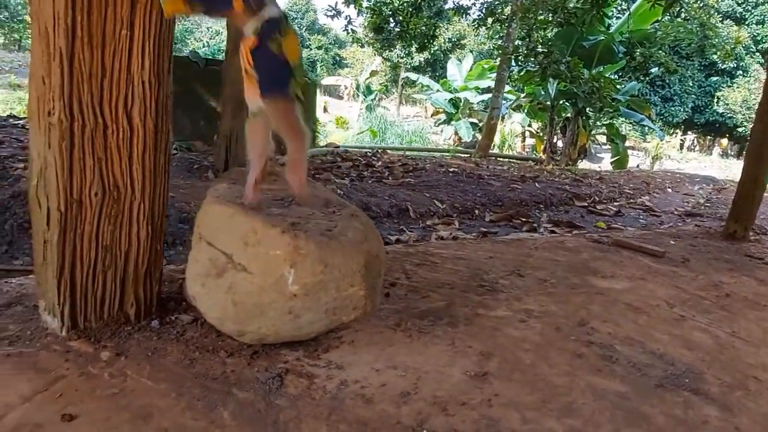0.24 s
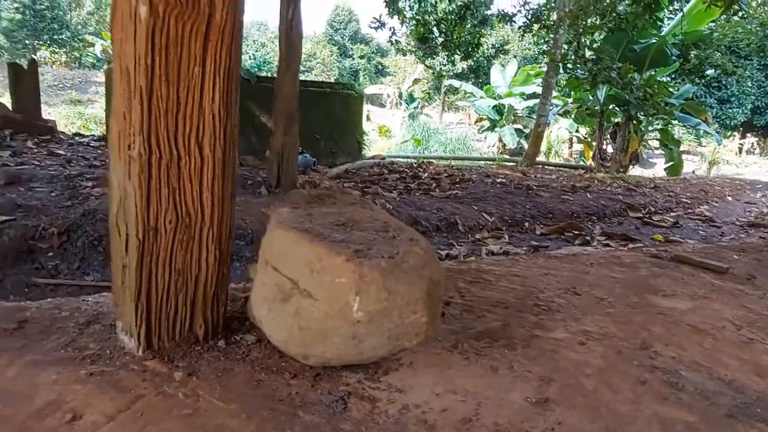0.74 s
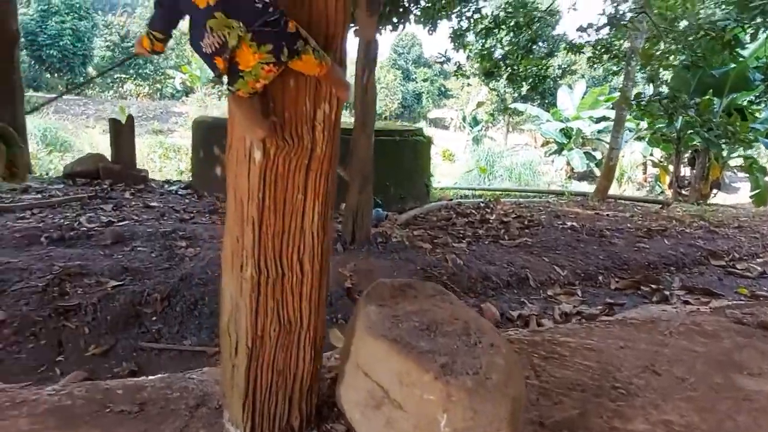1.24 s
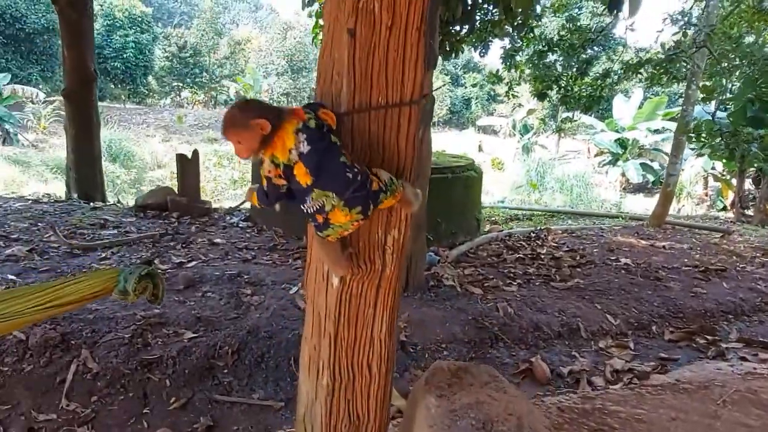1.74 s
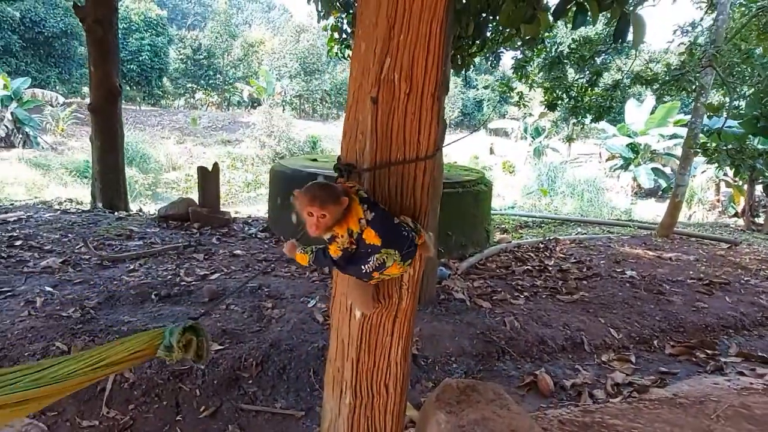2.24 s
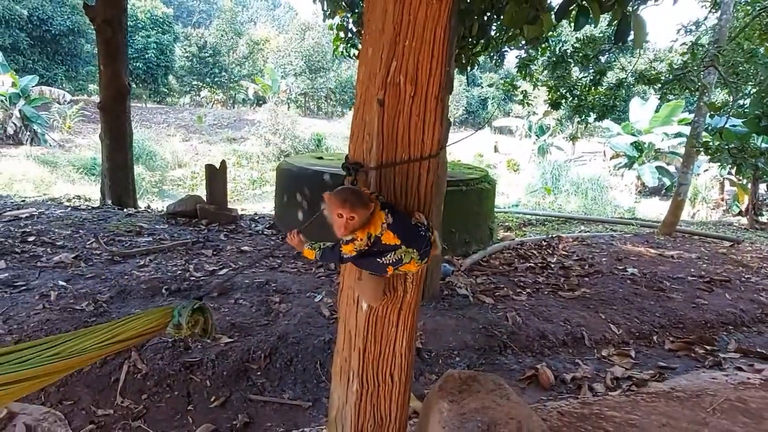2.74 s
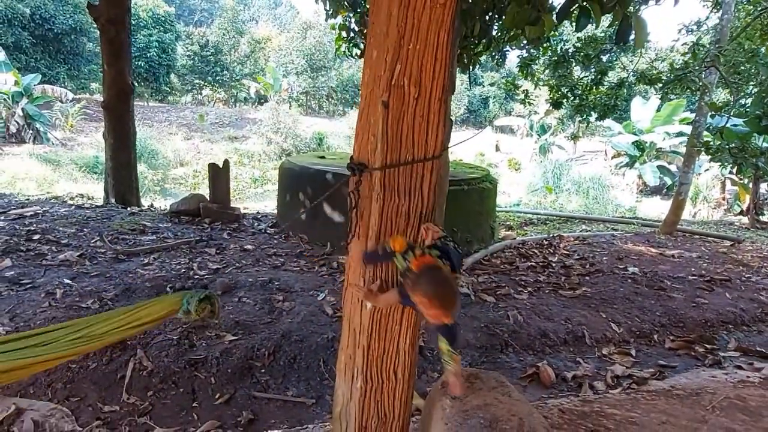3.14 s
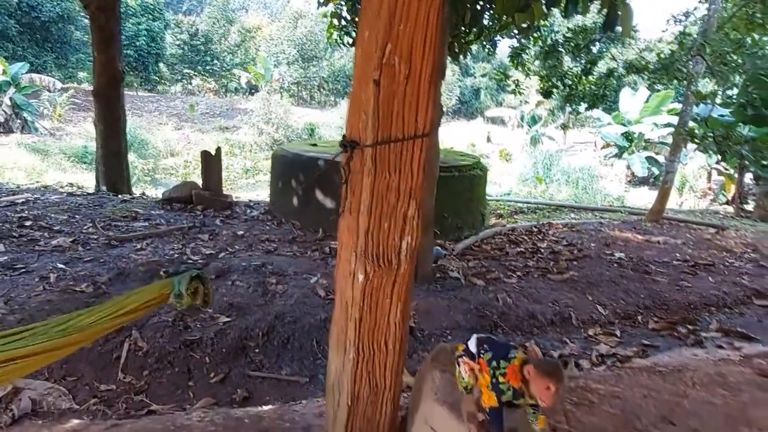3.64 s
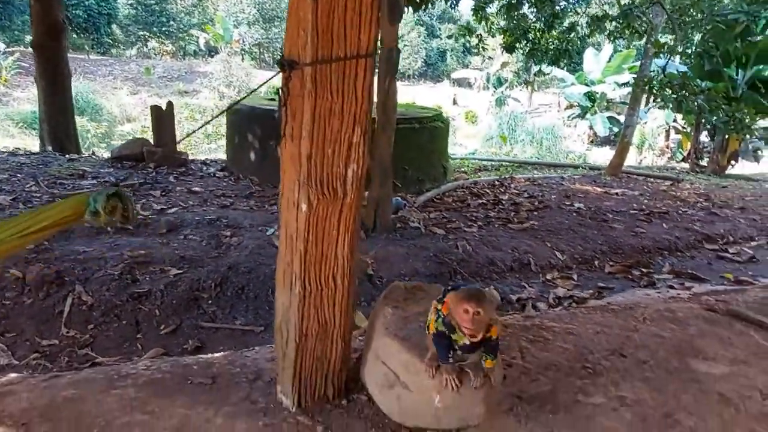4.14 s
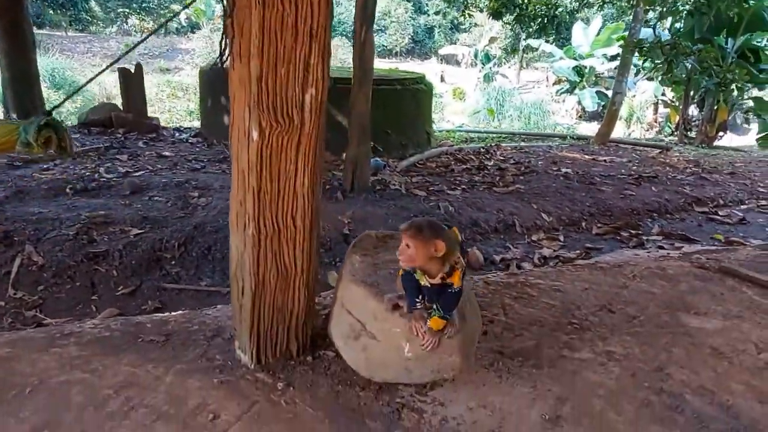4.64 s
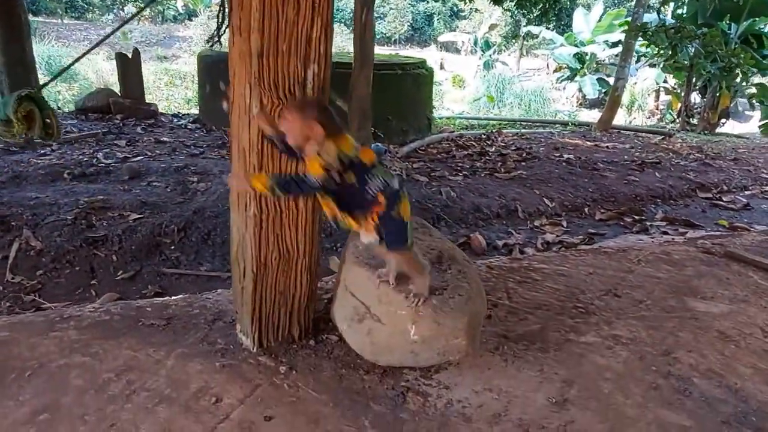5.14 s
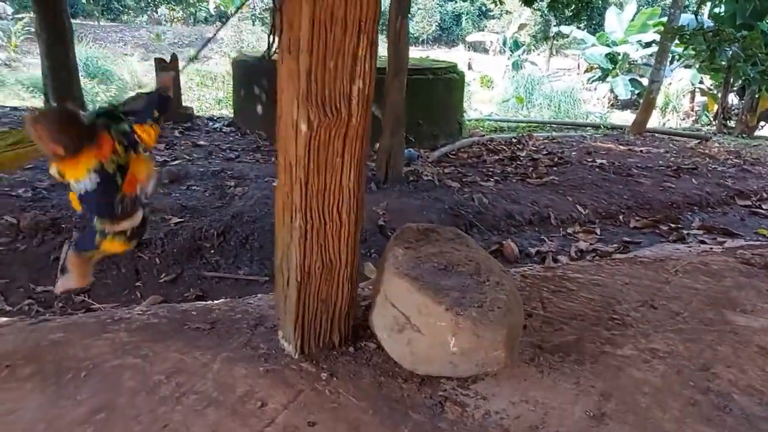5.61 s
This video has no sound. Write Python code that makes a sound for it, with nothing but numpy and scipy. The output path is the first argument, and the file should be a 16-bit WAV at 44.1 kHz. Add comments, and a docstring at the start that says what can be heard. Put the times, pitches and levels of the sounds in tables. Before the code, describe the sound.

Small monkey cries, two raspy screeches with clear coos between, plus light taps and scuffs on wood and stone in a quiet yard.

```python
"""A baby monkey calls as it climbs about in a quiet yard: a harsh screech, two clear coos (one falling,
one whipping upward), a whimper and a second screech. Screeches are harmonic stacks that tear into rasp;
coos are two sine partials with fluttering overtones. Hands and feet tap and scuff on a wooden post and a
stone in bursts of coloured noise; insects buzz in narrow noise bands, and a small bird peeps far off in
two falling sines. The ground and the shelter around the post answer with a short echo."""
import sys
import numpy as np
from scipy import signal
from scipy.fft import rfft, irfft, next_fast_len
from scipy.io import wavfile
from scipy.ndimage import uniform_filter1d, map_coordinates

SR = 44100
rng = np.random.default_rng(int(sys.argv[2]) if len(sys.argv) > 2 else 0)


def generate_wav(signal):
    """Clip the signal to [-1, 1] and save it as 16-bit WAV at the path in sys.argv[1]."""
    frames = np.transpose(np.atleast_2d(signal))
    scaled = np.clip(frames, -1, 1) * 32767
    pcm = np.round(scaled).astype(np.int16)
    wavfile.write(sys.argv[1], SR, pcm)


N = 258867
TIME = np.arange(N) / SR

# pitch of the first screech, then of the whimper and second screech: [t/s, f/Hz]
SCREECH_PITCHES = [
    [(.522, 722), (.55, 815), (.572, 935), (.605, 935), (.63, 900), (.645, 880), (.658, 805), (.69, 782),
     (.717, 773), (.728, 716), (.75, 707), (.82, 590), (.855, 500), (.895, 311)],
    [(5.19, 672), (5.215, 640), (5.245, 592), (5.28, 625), (5.32, 685), (5.36, 782), (5.39, 675),
     (5.405, 765), (5.425, 784), (5.445, 762), (5.465, 786), (5.487, 745), (5.51, 835), (5.55, 752),
     (5.6, 780), (5.7, 850)],
]
# register levels before their trims: [t/s, fundamental level/dB, throat level/dB, shrill rasp level/dB]
FIRST_SCREECH_LEVELS = [(.51, -61, -59, -58), (.522, -48, -45, -51), (.552, -50, -40, -41),
                        (.59, -50, -44, -37), (.61, -47, -41, -36), (.64, -52, -33, -23),
                        (.662, -42, -35, -22), (.682, -48, -34, -25), (.712, -54, -31, -21.5),
                        (.726, -38.5, -35, -25), (.765, -37, -34.5, -24), (.82, -41, -37, -34),
                        (.858, -44, -35, -42), (.882, -45, -44, -48), (.915, -66, -55, -59)]
SECOND_SCREECH_LEVELS = [(5.19, -66, -47, -52), (5.232, -54, -49, -53), (5.26, -53, -51, -53),
                         (5.308, -65, -52, -51), (5.358, -47, -43, -37), (5.382, -56, -44, -35),
                         (5.412, -46, -37, -23.5), (5.474, -48, -36, -23), (5.502, -53, -38, -29),
                         (5.602, -63, -46, -36), (5.646, -65, -44, -35), (5.7, -71, -53, -43),
                         (5.8, -95, -72, -62)]
# how far the voice tears: [t/s, roughness 0-1]
ROUGHNESS = [(.555, .55), (.58, .35), (.635, .25), (.66, .5), (.695, .3), (.76, .32), (.83, .5), (.9, .55),
             (5.19, .45), (5.355, .4), (5.385, .55), (5.41, .3), (5.45, .38), (5.5, .6), (5.57, .7),
             (5.63, .97)]
# main resonance of the mouth: [t/s, f/Hz]
MOUTH_RESONANCE = [(.51, 3000), (.575, 3650), (.6, 3750), (.64, 3580), (.675, 3170), (.72, 3120),
                   (.745, 3550), (.8, 3220), (.87, 3030), (5.19, 2750), (5.24, 2600), (5.3, 3050),
                   (5.44, 3100), (5.49, 3300), (5.56, 3050), (5.65, 3600)]
# high whistling resonance: [t/s, f/Hz, share of the air noise 0-1]
WHISTLE = [(.62, 8100, .15), (.71, 8550, .25), (.76, 8200, .2), (5.49, 8500, .12), (5.54, 10000, .15),
           (5.63, 9400, .4), (5.7, 8650, .7)]
# colour of the throat register: [f/Hz, relative level/dB]
THROAT_SPECTRUM = [(900, -25), (1500, -11), (2100, -6), (3000, -2.5), (3600, -1), (4600, -4), (5900, -9),
                   (6600, -25)]
# colour of the shrill register in each screech: [f/Hz, relative level/dB]
FIRST_SHRILL_SPECTRUM = [(5300, -33), (6400, -11), (7000, -3), (8400, 0), (11000, -5), (12500, -14),
                         (15500, -26)]
SECOND_SHRILL_SPECTRUM = [(4600, -32), (5400, -11), (7000, -3), (8500, 0), (10500, -6), (11500, -14),
                          (15500, -28)]
MOUTH_WIDTH_HZ, MOUTH_BOOST = 220, 3.2  # half-width; gain added at the peak
WHISTLE_WIDTH_HZ, WHISTLE_BOOST = 300, 1.3
TONE_DB, THROAT_DB, RASP_DB = -1, 2, 1.5  # register trims
GROWL_HZ, GROWL_DEPTH = 240, 1.8  # mean rate; depth at full roughness


def screech(pitch_rows, level_rows, shrill_spectrum, fizz_db):
    """Strained folds give harmonics far into the treble, which tear into rasp and catch again."""
    pitch, mouth_hz = curve(pitch_rows), curve(MOUTH_RESONANCE)
    rough = np.clip(curve(ROUGHNESS), 0, 1)
    low, throat, shrill = gains(level_rows)
    s, centres, shares = np.transpose(WHISTLE)
    whistle_hz = np.interp(TIME, s, centres)
    whistling = np.clip(np.interp(TIME, s, shares), 0, 1)

    unsteady = rough * (.022 * wobble(900) + .018 * wobble(220) + .016 * wobble(70))
    phase = 2 * np.pi * np.cumsum(pitch * (1 + unsteady)) / SR
    puffs = unit(1 + .5 * np.cos(phase))  # air escapes once a cycle
    # strong and weak cycles alternate in fits, which puts lines between the harmonics
    uneven = unit(1 + (.1 + .6 * rough) * wobble(35) * np.cos(phase / 2))
    # a slower throat vibration flanks each harmonic with wandering side tones
    growl_depth = GROWL_DEPTH * rough ** 2
    growl_phase = 2 * np.pi * np.cumsum(GROWL_HZ * (1 + .22 * wobble(45))) / SR
    growl = (1 + growl_depth * np.cos(growl_phase)) / np.sqrt(1 + growl_depth ** 2 / 2)

    def register(spectrum, orders, centre, width, boost, airy, ringing):
        """Harmonics and air noise through one moving resonance."""
        def response(hz):
            """Spectrum colour with a peak at the resonance."""
            return amp(along(spectrum, hz)) * (1 + boost / (1 + ((hz - centre) / width) ** 2))

        stack = harmonics(phase, pitch, response, orders, flicker_db=4.5, flicker_rate=110)
        lines = uneven * growl * stack
        breath = np.array([noise(spectrum), noise(spectrum)])  # separate left and right
        hiss = np.sqrt(1 - ringing) * breath + np.sqrt(ringing) * whistle(centre, 2 * width)
        return np.sqrt(1 - airy) * lines + np.sqrt(airy) * puffs * hiss

    middle = register(THROAT_SPECTRUM, np.arange(2, 15), mouth_hz, MOUTH_WIDTH_HZ, MOUTH_BOOST,
                      airy=.3 * rough ** 2, ringing=.2)
    high = register(shrill_spectrum, np.arange(6, 26), whistle_hz, WHISTLE_WIDTH_HZ, WHISTLE_BOOST,
                    airy=rough ** 1.8, ringing=whistling)
    fizz = puffs * noise([(9000, -30), (12500, 0), (15500, -2.5)])

    torn = rough ** 3  # share of the fundamental that turns to noise
    flicker = unit(amp(6 * rough * wobble(90)))
    tone = np.sqrt(2 * (1 - torn)) * np.sin(phase) * uneven * flicker
    tone = tone + np.sqrt(torn) * noise([(200, -20), (450, -2), (1000, 0), (1700, -14)])

    voice = placed(amp(TONE_DB) * low * tone, 1.5) + placed(amp(THROAT_DB) * throat * middle, 3)
    voice = voice + amp(RASP_DB) * shrill * high + placed(amp(fizz_db) * shrill * fizz, 4)
    return voice * unit(amp(1.3 * wobble(260)))


def whistle(centre_hz, width_hz):
    """Air ringing in one narrow, ragged, wandering band."""
    phase = 2 * np.pi * np.cumsum(centre_hz * (1 + 0.012 * wobble(70))) / SR
    return wobble(width_hz) * np.sin(phase) + wobble(width_hz) * np.cos(phase)


# pitch of the falling and the rising coo, before jitter: [t/s, f/Hz]
FALL_PITCH = [(3.84, 1250), (3.86, 1236), (3.898, 1230), (3.912, 1200), (3.95, 1146), (3.972, 1050),
              (3.995, 939)]
RISE_PITCH = [(4.8, 1204), (4.838, 1348), (4.915, 1484), (4.96, 1512), (5.005, 1512), (5.038, 1605),
              (5.052, 1780), (5.067, 2180), (5.078, 2575)]
# overtones from the third partial up: [t/s, level/dB, treble lift from strain/dB]
FALL_OVERTONES = [(3.842, -39, 0), (3.905, -38, -1), (3.945, -47, 0), (3.975, -39, -2), (3.992, -50, 0)]
RISE_OVERTONES = [(4.81, -56, 0), (4.84, -37, -1), (4.88, -39, 0), (4.96, -34, 2), (5.0, -36, 1),
                  (5.032, -32, 13), (5.078, -43, 13)]
# how the mouth passes the lowest two partials: [f/Hz, gain/dB]
COO_MOUTH = [(1230, -14), (1400, -20), (1500, -29), (1750, -15), (2230, -14), (2470, 0), (2800, 0),
             (3030, -4), (3280, -6), (3550, -9), (5200, -21)]
# colour of the coo overtones: [f/Hz, relative level/dB]
OVERTONE_SPECTRUM = [(2800, 10.5), (4700, 3), (5400, -14), (7600, -24.5), (12500, -36), (15500, -44)]
STRAIN_ABOVE_HZ = 5400
COO_FLICKER_DB, COO_FLICKER_RATE = 3.2, 150  # depth scale; knots a second


def coo(pitch_rows, shape, overtone_rows, jitter, shimmer_db, second_left_db, overtone_left_db, rasp_db):
    """Two clear partials shaped by the mouth resonance; strain brightens the fluttering overtones."""
    pitch = curve(pitch_rows)
    # the folds turn rough where the pitch slides fast
    slide_speed = uniform_filter1d(np.abs(np.gradient(np.log(pitch))), size=1300) * SR
    slide = np.clip(slide_speed / 12, 0, 1)
    unsteady = jitter * wobble(350) + .024 * slide * wobble(900)
    phase = 2 * np.pi * np.cumsum(pitch * (1 + unsteady)) / SR
    effort = coo_effort(*shape)
    low, second = [effort * amp(along(COO_MOUTH, k * pitch)) for k in (1, 2)]
    upper, strain = gains(overtone_rows)

    def colour(hz):
        """Overtone colour, with the strain lift in the treble only."""
        lift = (strain - 1) / (1 + (STRAIN_ABOVE_HZ / hz) ** 20)
        return amp(along(OVERTONE_SPECTRUM, hz)) * (1 + lift)

    flutter = .3 * wobble(110)  # radians
    overtones = harmonics(phase + flutter, pitch, colour, np.arange(3, 11), COO_FLICKER_DB, COO_FLICKER_RATE)
    hiss = noise([(1200, -40), (2000, 0), (4500, 0), (8000, -10), (15500, -35)])
    rasp = (amp(rasp_db) + slide ** 2) * hiss
    voice = placed(np.sqrt(2) * low * np.sin(phase), 1)
    voice = voice + placed(np.sqrt(2) * second * np.sin(2 * phase), second_left_db)
    top = placed(upper * ((1 - .85 * slide ** 2) * overtones + rasp), overtone_left_db)
    return (voice + top) * amp(shimmer_db * wobble(110))


# effort of each coo: [start t/s, attack t/s, hold t/s, length t/s, level/dB before the mouth, sag/(dB/s)]
# hold and length count from the start
FALL_COO = (3.839, .009, .049, .147, -20.8, 150)
RISE_COO = (4.799, .041, .16, .272, -21.5, 38)
COO_RELEASE_S = .008


def coo_effort(start, attack, hold, length, db, sag):
    """A coo swells, holds, sags and dies away quickly."""
    age = np.maximum(TIME - start, 0)
    swell = np.minimum(age / attack, 1) ** 2
    release = np.exp(-np.maximum(age - length, 0) / COO_RELEASE_S)
    return swell * amp(db - sag * np.maximum(age - hold, 0)) * release


# short lisps as the mouth opens: [t/s, level/dB]
LISPS = [(3.848, -46), (4.822, -51), (5.187, -32.5)]


def lisps():
    """A thin high hiss at the start of a call."""
    envelope = sum(amp(db) * burst(s, 0.0068, 0.22) for s, db in LISPS)
    return envelope * noise([(5000, -33), (10500, -6), (12500, 1), (15500, -4.5)])


# taps of hands and feet: [t/s, level/dB before the trims, treble click relative level/dB]
TAPS = [(0.493, -44, 3), (1.989, -47, 2), (4.28, -47, -19), (4.414, -24, -28), (4.423, -33, -28),
        (4.441, -34, -30.5)]
# scuffs on bark and stone: [t/s, level/dB, half-length t/s to 1/e]
SCUFFS = [(0.34, -55, 0.037), (0.44, -60.5, 0.079), (1.192, -60, 0.068), (3.428, -57, 0.053),
          (4.416, -60, 0.15)]
# colours of a tap and a scuff: [f/Hz, relative level/dB]
TAP_SPECTRUM = [(200, -21), (600, -16), (1100, -3), (1450, -8), (2100, 1.5), (3200, -8), (4300, -6),
                (5600, -21), (15500, -31)]
SCUFF_SPECTRUM = [(200, 11.5), (600, -7.5), (1300, -13.5), (2800, -4.5), (6000, -14.5), (10000, -9.5),
                  (15500, -12.5)]


def climbing():
    """Dry taps and soft scuffs of hands and feet, and a dull push off the stone."""
    def strike(s):
        """A sharp contact with a weaker, longer ring-down."""
        return burst(s, .0002, .006) + amp(-8) * burst(s, .0005, .06)

    knocks = sum(amp(db - 9) * strike(s) for s, db, _ in TAPS) * noise(TAP_SPECTRUM)
    click_envelope = sum(amp(db + click_db - 6) * strike(s) for s, db, click_db in TAPS)
    clicks = click_envelope * noise([(3000, -26.5), (9000, 5), (15500, -2)])
    rubs = humps(SCUFFS) * noise(SCUFF_SPECTRUM) * unit(amp(3.2 * wobble(300)))
    push_modes = [(285, -33), (555, -39), (900, -47), (1130, -50)]  # f/Hz, level/dB
    push = burst(.326, 0.019, 0.1) * sum(amp(db) * np.sin(2 * np.pi * hz * TIME) for hz, db in push_modes)
    return placed(knocks + clicks + rubs + push, 5.6)


# peeps of the far bird: [t/s, level/dB before a 4 dB lift]
PEEPS = [(2.72, -64), (3.01, -64)]


def bird():
    """Two thin peeps, each a sine whose pitch falls quickly."""
    def peep(s):
        """One falling tone under a short envelope."""
        pitch = 6850 + 900 * np.exp(-np.maximum(TIME - s, 0) / 0.016)
        return burst(s, 0.02, 0.16) * np.sin(2 * np.pi * np.cumsum(pitch) / SR)

    return placed(sum(amp(db) * peep(s) for s, db in PEEPS), 0) * amp(4)


# insect bands: [centre f/Hz, half-width f/Hz, relative level/dB]
INSECTS = [(2846, 164, 1.5), (4500, 230, -5.5), (5755, 225, -7.5), (6680, 300, -19)]
# colour of the outdoor air before its bass cut: [f/Hz, relative level/dB]
AIR_SPECTRUM = [(25, -31), (52, 6), (110, -3), (209, -11.5), (297, -5.5), (567, -30), (1300, -32.5),
                (2490, -35), (4500, -30), (7700, -28.5), (13900, -24.5), (15500, -34)]
# swells of the low rumble: [t/s, level/dB, half-length t/s to 1/e]
SWELLS = [(.63, -47.5, .09), (.85, -54.5, .16), (4.39, -54, .09), (5.3, -62.5, .4)]
RUMBLE_DB = -62.5  # steady part


def background():
    """A chorus of insects in narrow bands, faint outdoor air and a low rumble."""
    def insect_bands(hz):
        """Sum of narrow resonant peaks."""
        return sum(amp(db) / (1 + ((hz - centre) / width) ** 2) for centre, width, db in INSECTS)

    def air_colour(hz):
        """Air spectrum with the bass rolled off."""
        return amp(along(AIR_SPECTRUM, hz)) / (1 + (130 / (hz + 1)) ** 2)

    def rumble_colour(hz):
        """Energy mostly around 55 to 115 Hz."""
        return amp(along([(20, -33), (55, -2.5), (115, -4), (200, -15.5), (600, -27.5), (2000, -92)], hz))

    chorus = ambient(insect_bands)
    insects = amp(-64.5) * chorus * amp(0.4 * wobble(1.1) + 0.43 * wobble(65))
    air = amp(-64.5) * ambient(air_colour)
    rumble = (amp(RUMBLE_DB) + humps(SWELLS)) * ambient(rumble_colour)
    return placed(insects, 4) + placed(air + rumble, 2.0)


# likeness of left and right in the ambience: [f/Hz, correlation]
ALIKE = [(60, 0.85), (200, 0.88), (550, 0.62), (1650, -0.1)]


def ambient(response):
    """Stereo noise of rms 1 from all around: alike in the bass, unrelated in the treble."""
    def mid_side(hz):
        """Mid and side shares that give the wanted correlation."""
        turn = np.arccos(np.clip(along(ALIKE, hz), -1, 1)) / 2
        return response(hz) * np.array([np.cos(turn), np.sin(turn)])

    mid, side = filtered(rng.standard_normal((2, N)), mid_side)
    return unit(np.array([mid + side, mid - side]))


# decay of the yard's tail: [f/Hz, t/s to fall 60 dB]
YARD_DECAY = [(200, 0.59), (1200, 0.3), (15000, 0.31)]


def echo(x, early_db, tail_db):
    """Treble scatters off the nearby bark and ground, then a diffuse tail differs at each ear."""
    hz, t, z = signal.stft(rng.standard_normal((2, SR // 2)), SR, nperseg=256)
    decay = amp(-60 * t / along(YARD_DECAY, hz)[:, None])
    tail = signal.istft(z * decay, SR, nperseg=256)[1]
    age = np.arange(tail.shape[1]) / SR
    early = rng.standard_normal(tail.shape) * amp(-60 * age / .025)
    tail = tail * (1 - np.exp(-age / 0.018))
    response = amp(early_db) * early / np.linalg.norm(early[0])
    response = response + amp(tail_db) * tail / np.linalg.norm(tail[0])
    scattered = filtered(x, lambda hz: hz ** 2 / (hz ** 2 + 1100 ** 2))
    return signal.fftconvolve(scattered, response, axes=1)[:, :N]


def ports(x, apart):
    """Two microphone ports hear one wave in different phase; apart holds (f/Hz, radians)."""
    return filtered(x, lambda hz: np.exp(.5j * along(apart, hz) * np.array([[1], [-1]])))


def harmonics(phase, pitch, response, orders, flicker_db, flicker_rate):
    """Partials of the vocal folds, each flickering by itself, weighted by the throat; steady mean power."""
    weights = [response(k * pitch) * (k * pitch < SR / 2) for k in orders]
    wave = 0
    for k, weight in zip(orders, weights):
        flicker = unit(amp(flicker_db * wobble(flicker_rate)))
        wave = wave + weight * flicker * np.sin(k * phase + rng.uniform(0, 2 * np.pi))
    return wave / np.sqrt(sum(w * w for w in weights) / 2)


def burst(s, attack, t60):
    """An envelope that rises at s and dies away by 60 dB in t60 seconds."""
    t = np.maximum(TIME - s, 0)
    return (1 - np.exp(-t / attack)) * amp(-60 * t / t60)


def humps(rows):
    """Smooth rises and falls, one for each (t/s, level/dB, half-length/s) row."""
    return sum(amp(db) * np.exp(-((TIME - s) / length) ** 2) for s, db, length in rows)


def placed(x, left_db):
    """Louder on the left by left_db; mono becomes stereo."""
    return x * amp([[left_db / 2], [-left_db / 2]])


def noise(spectrum):
    """Coloured noise of rms 1."""
    return unit(filtered(rng.standard_normal(N), lambda hz: amp(along(spectrum, hz))))


def filtered(x, response):
    """x times a response of frequency."""
    m = next_fast_len(N + SR // 2)
    return irfft(rfft(x, m) * response(np.fft.rfftfreq(m, 1 / SR)), m)[..., :N]


def wobble(rate):
    """A smooth random curve, rate knots a second."""
    return map_coordinates(rng.standard_normal(int(N * rate / SR) + 4), [TIME * rate])


def gains(rows, fade=0.0044):
    """One gain per sample for each dB column, silent outside the rows."""
    s, *cols = np.transpose(rows)
    gate = np.interp(TIME, [s[0] - fade, s[0], s[-1], s[-1] + fade], [0, 1, 1, 0])
    return np.array([gate * amp(np.interp(TIME, s, c)) for c in cols])


def curve(rows):
    """One value per sample from (t/s, value) rows."""
    return np.interp(TIME, *np.transpose(rows))


def along(points, hz):
    """(f/Hz, value) points read on a log axis."""
    f, v = np.transpose(points)
    return np.interp(np.log(hz + 1), np.log(f + 1), v)


def unit(x):
    """Scaled to rms 1."""
    return x / np.sqrt(np.mean(x ** 2) + 1e-20)


def amp(db):
    """Decibels to gain."""
    return 10 ** (np.asarray(db) / 20)


def scene():
    """The monkey near the post, the yard around it."""
    fall = coo(FALL_PITCH, FALL_COO, FALL_OVERTONES, jitter=.003, shimmer_db=0.6,
               second_left_db=7, overtone_left_db=0.5, rasp_db=-15)
    rise = coo(RISE_PITCH, RISE_COO, RISE_OVERTONES, jitter=.005, shimmer_db=2.0,
               second_left_db=8.5, overtone_left_db=-0.5, rasp_db=-28.5)
    coos = ports(amp(-0.5) * (fall + rise), [(1300, -0.27), (2600, -1.73), (4600, -1.3)])
    clear = coos + climbing() + bird()

    first = screech(SCREECH_PITCHES[0], FIRST_SCREECH_LEVELS, FIRST_SHRILL_SPECTRUM, fizz_db=-8)
    second = screech(SCREECH_PITCHES[1], SECOND_SCREECH_LEVELS, SECOND_SHRILL_SPECTRUM, fizz_db=-15)
    harsh = first + second + placed(lisps(), 1.3)
    harsh = ports(harsh, [(900, -0.15), (3000, -1.8), (8500, -1.7), (14000, -1.7)])

    answer = echo(clear, early_db=-13, tail_db=-9) + echo(harsh, early_db=-5, tail_db=-12)
    return clear + harsh + answer + background()


TOP_HZ = 15750


def record(dry):
    """A steep low-pass keeps nothing above the band limit."""
    return filtered(dry, lambda hz: hz < TOP_HZ)


dry = scene()
out = record(dry)
generate_wav(out)
```